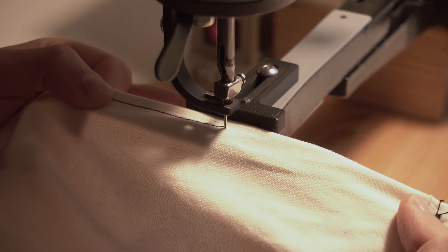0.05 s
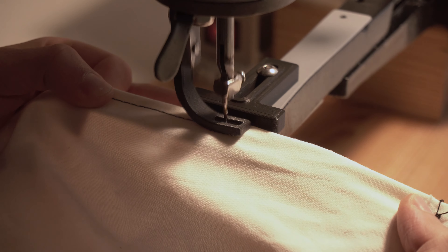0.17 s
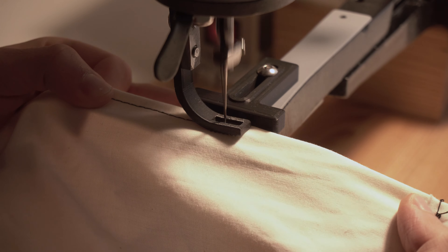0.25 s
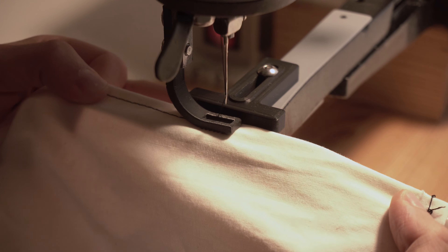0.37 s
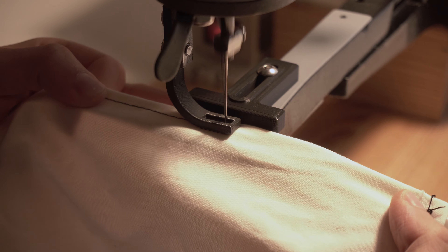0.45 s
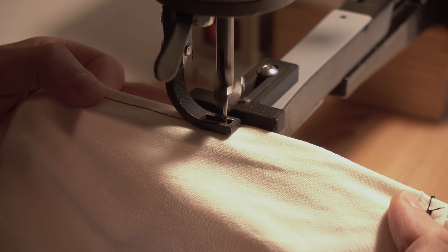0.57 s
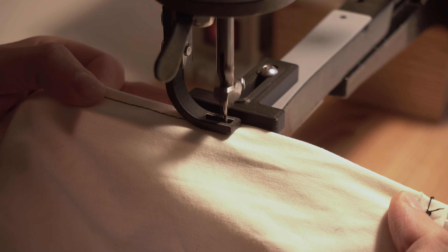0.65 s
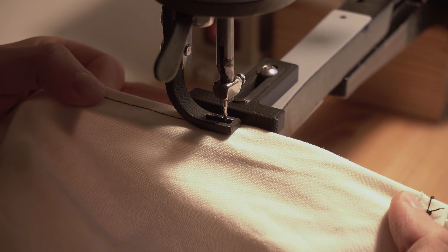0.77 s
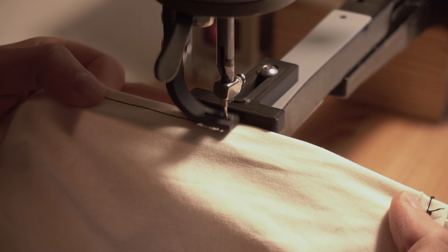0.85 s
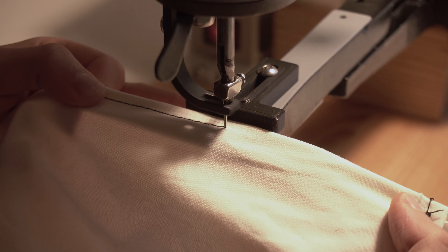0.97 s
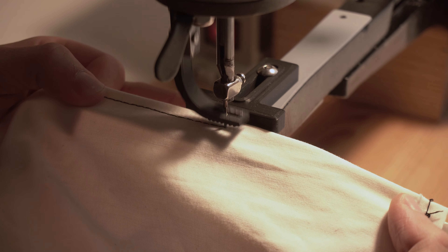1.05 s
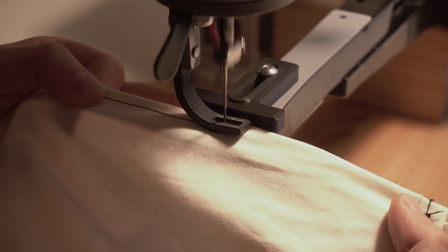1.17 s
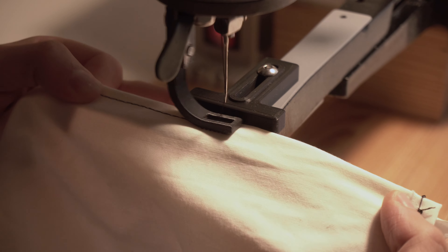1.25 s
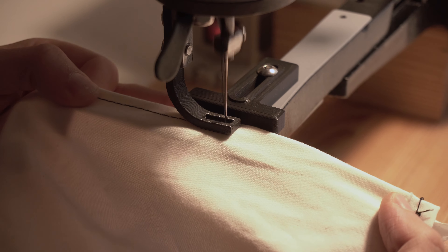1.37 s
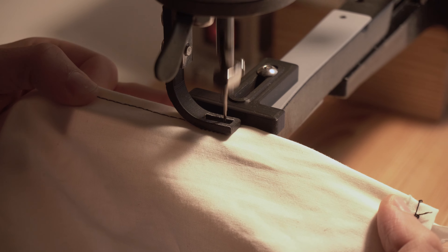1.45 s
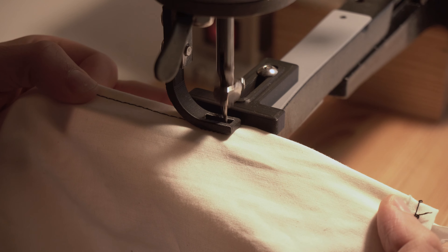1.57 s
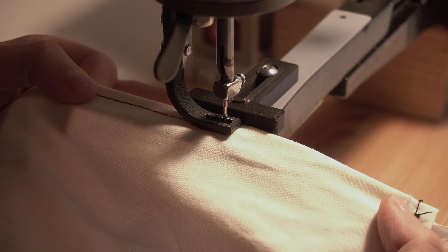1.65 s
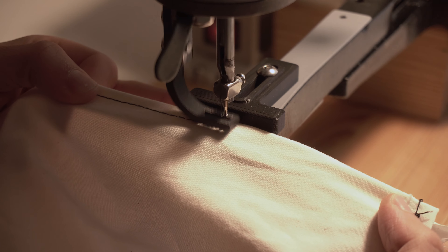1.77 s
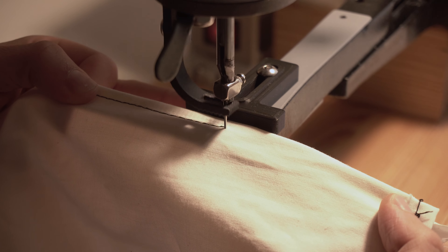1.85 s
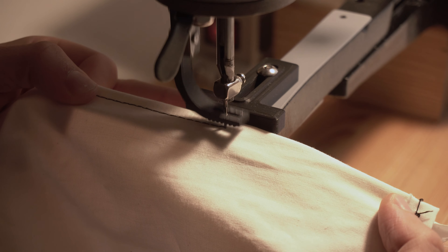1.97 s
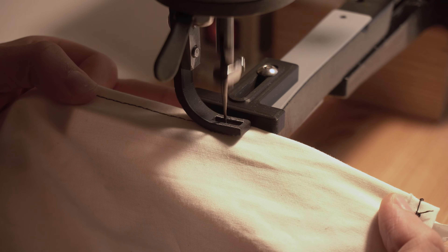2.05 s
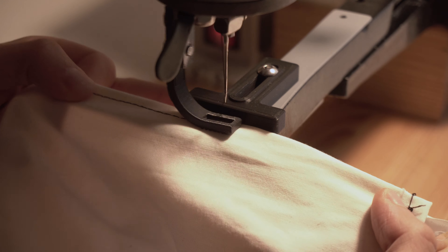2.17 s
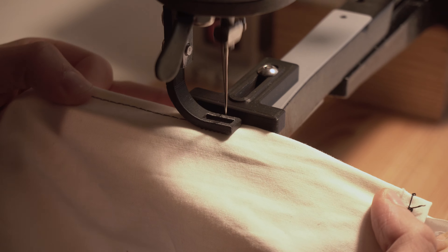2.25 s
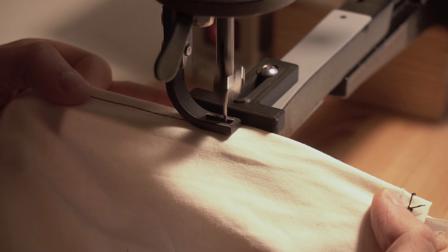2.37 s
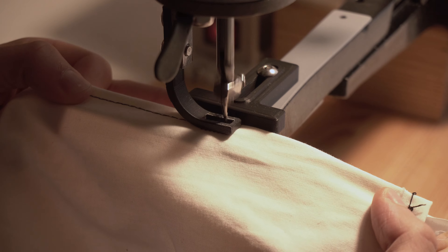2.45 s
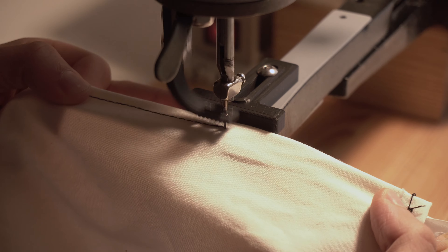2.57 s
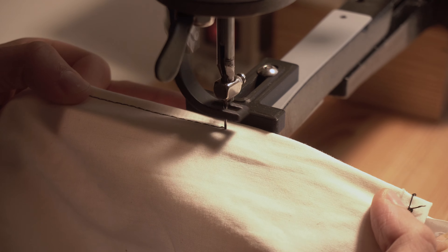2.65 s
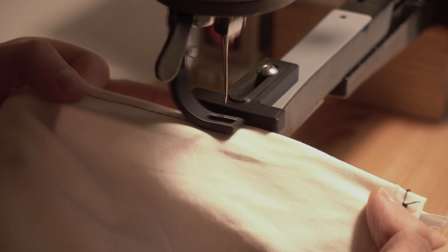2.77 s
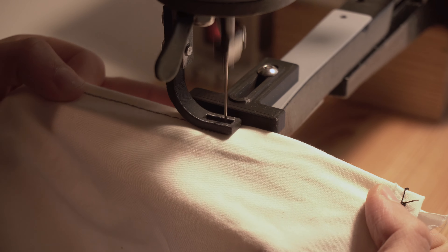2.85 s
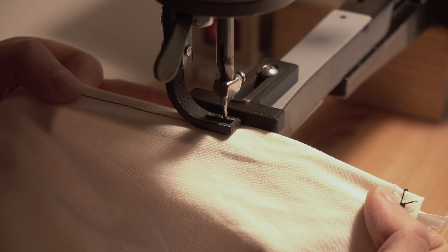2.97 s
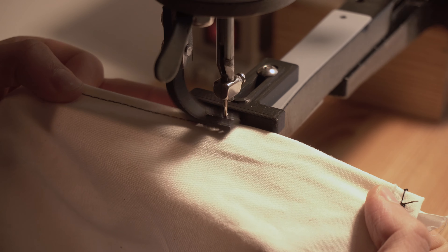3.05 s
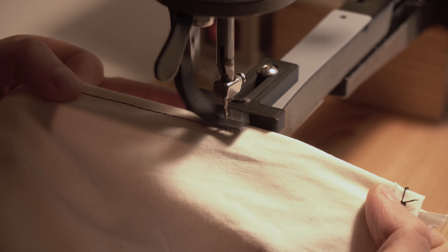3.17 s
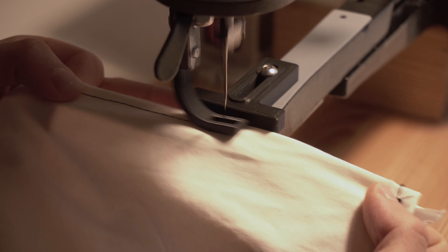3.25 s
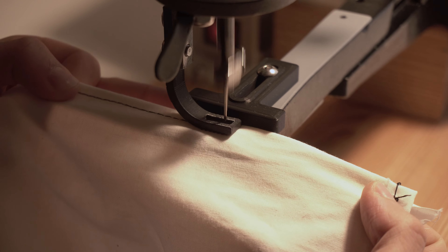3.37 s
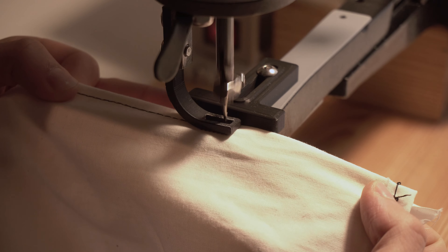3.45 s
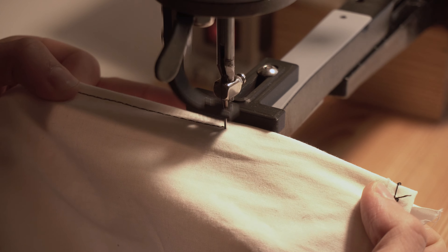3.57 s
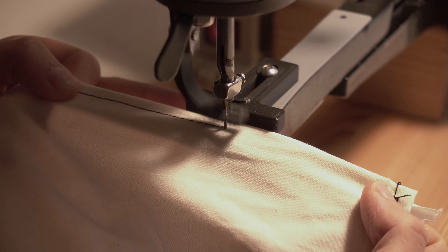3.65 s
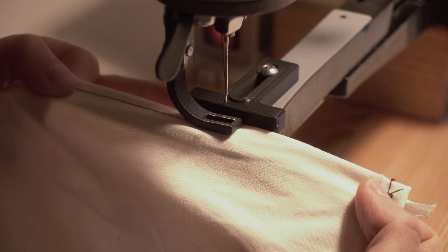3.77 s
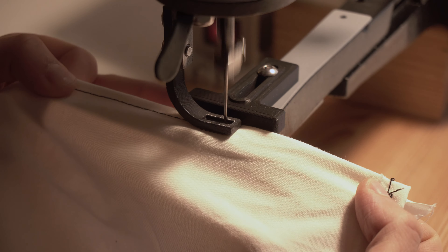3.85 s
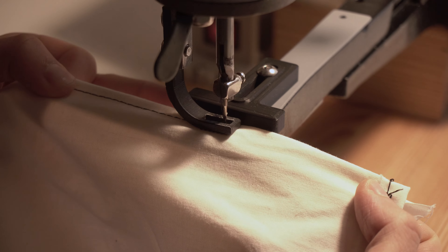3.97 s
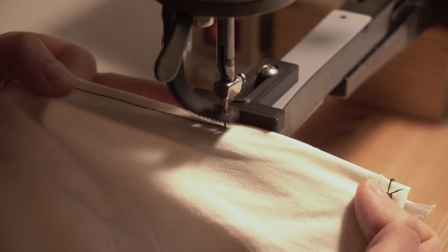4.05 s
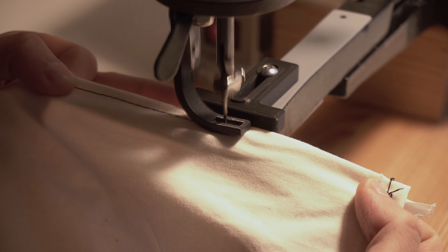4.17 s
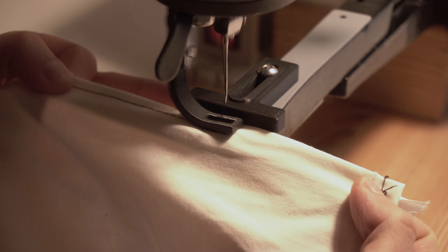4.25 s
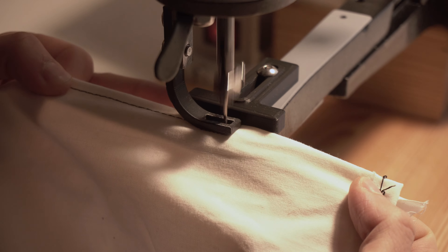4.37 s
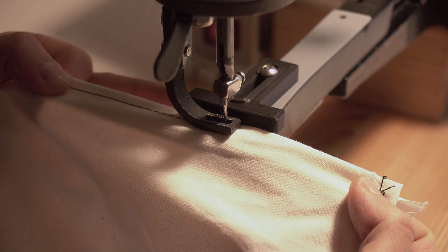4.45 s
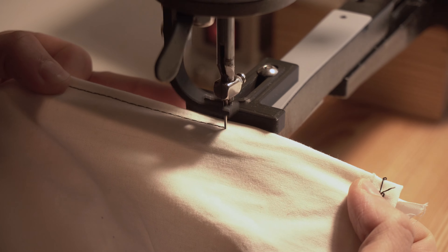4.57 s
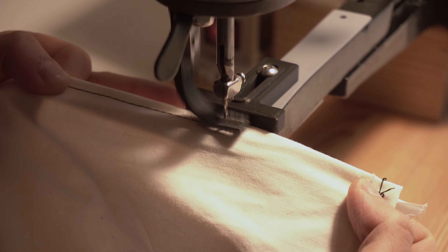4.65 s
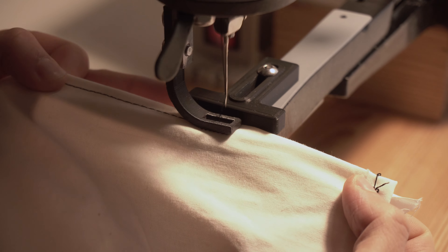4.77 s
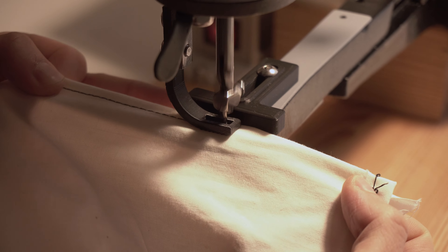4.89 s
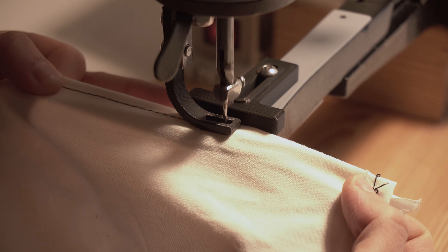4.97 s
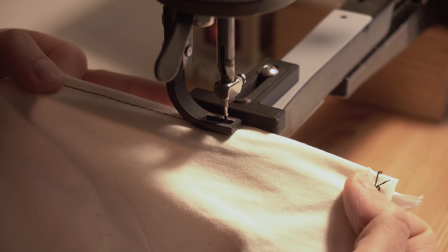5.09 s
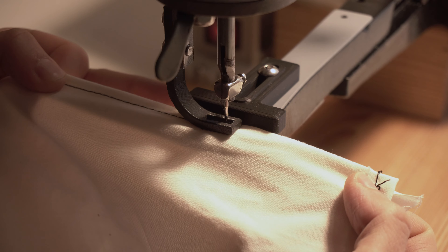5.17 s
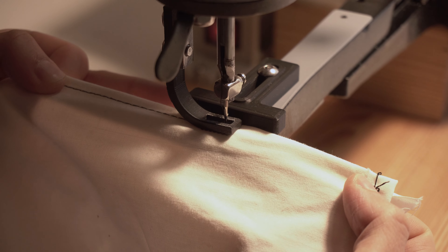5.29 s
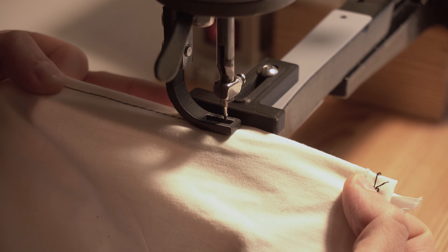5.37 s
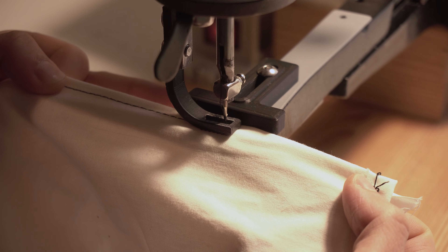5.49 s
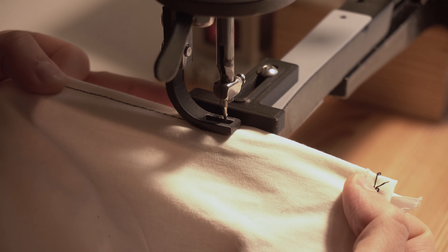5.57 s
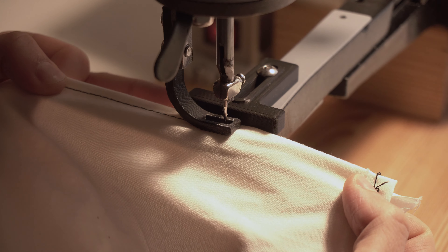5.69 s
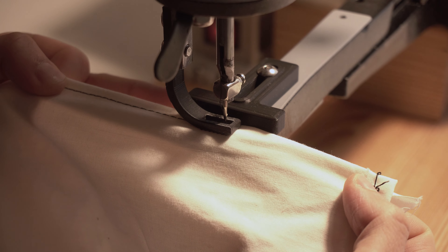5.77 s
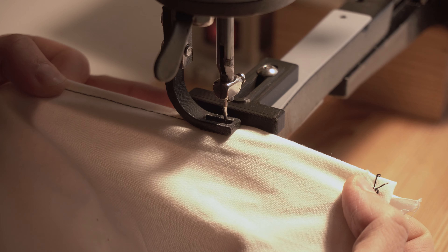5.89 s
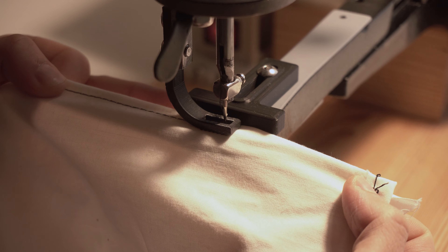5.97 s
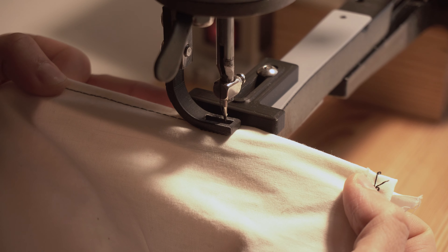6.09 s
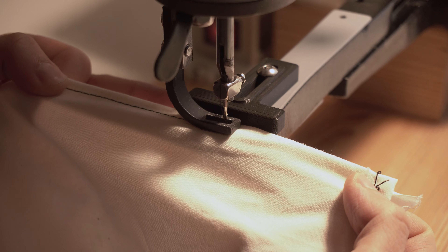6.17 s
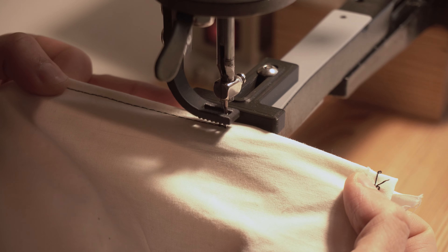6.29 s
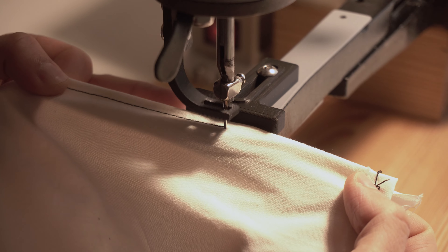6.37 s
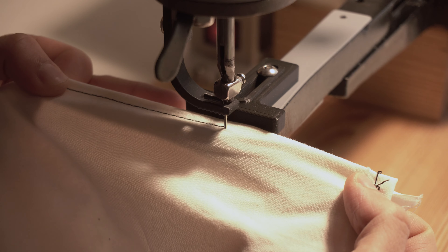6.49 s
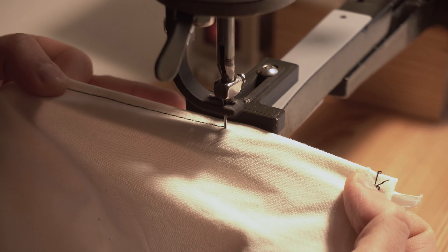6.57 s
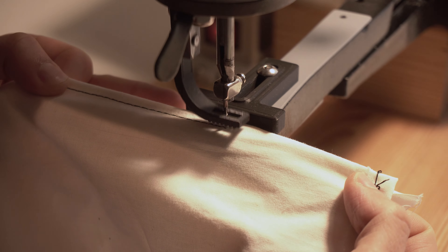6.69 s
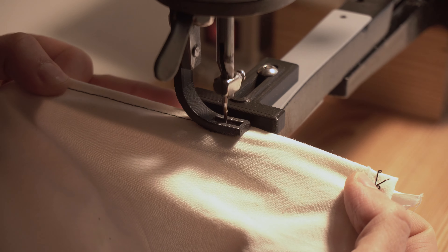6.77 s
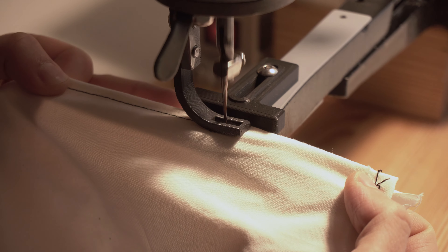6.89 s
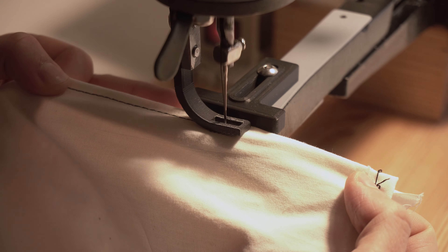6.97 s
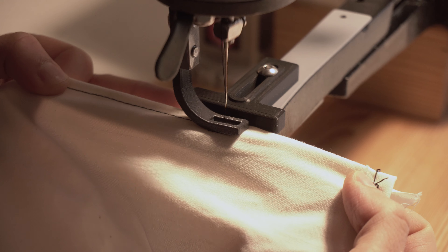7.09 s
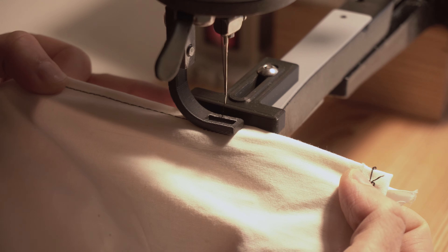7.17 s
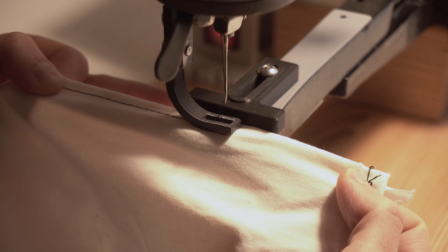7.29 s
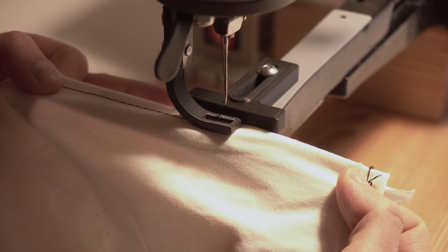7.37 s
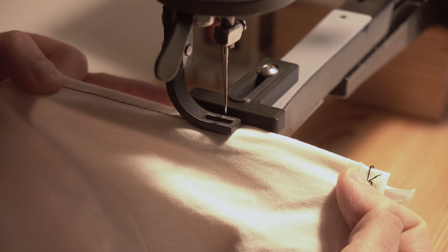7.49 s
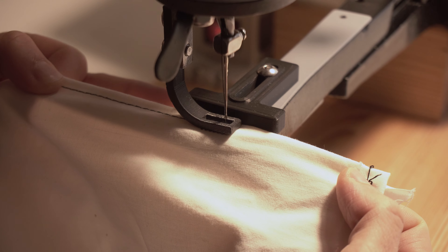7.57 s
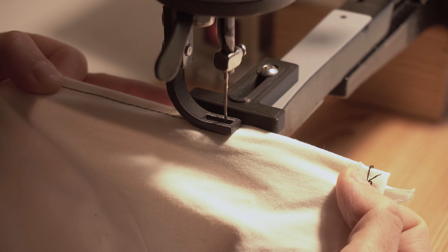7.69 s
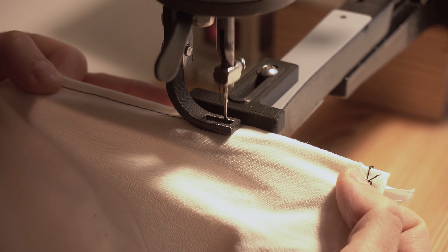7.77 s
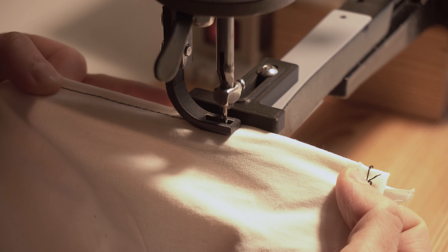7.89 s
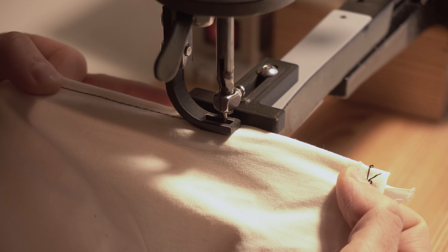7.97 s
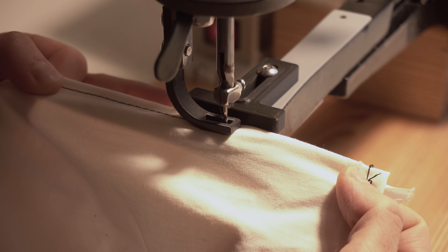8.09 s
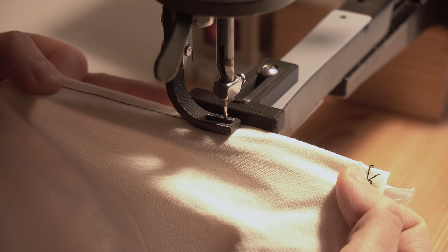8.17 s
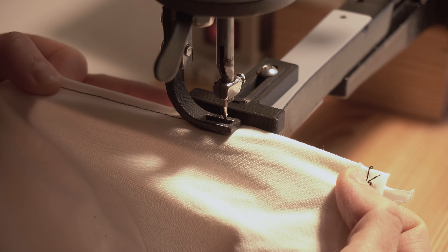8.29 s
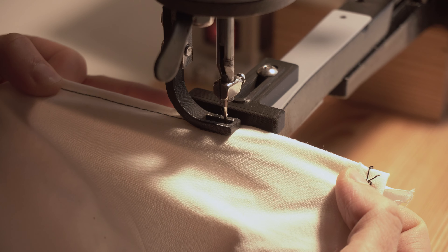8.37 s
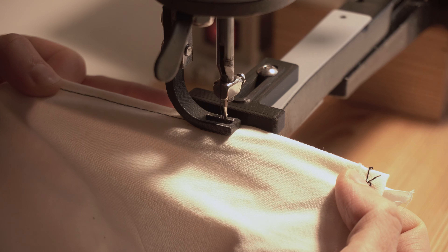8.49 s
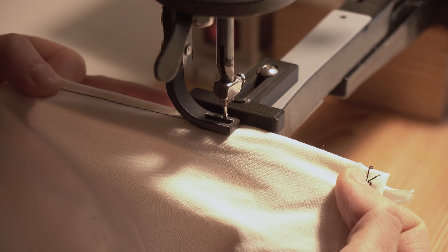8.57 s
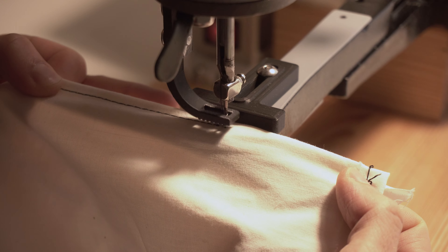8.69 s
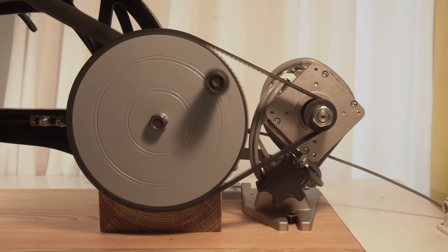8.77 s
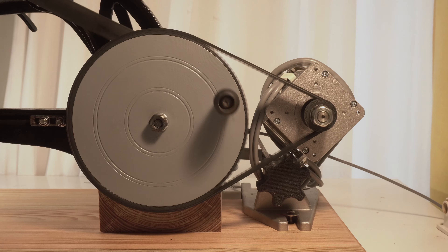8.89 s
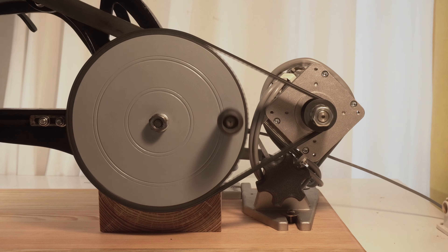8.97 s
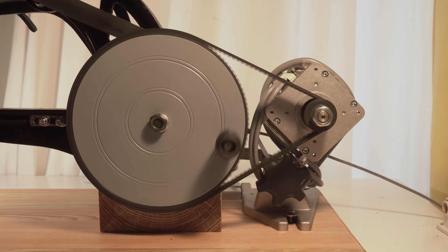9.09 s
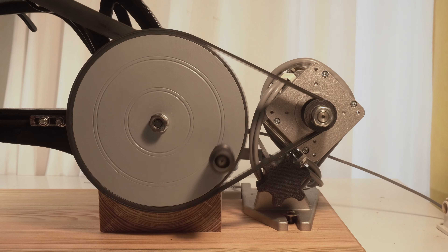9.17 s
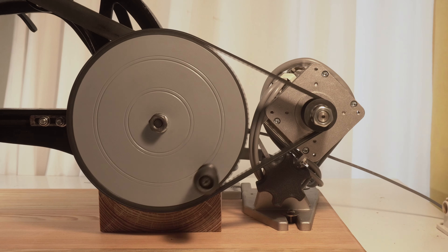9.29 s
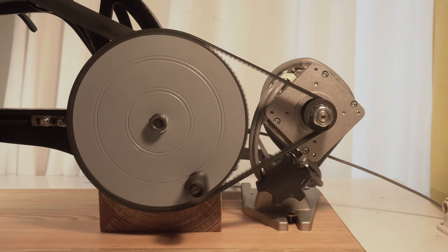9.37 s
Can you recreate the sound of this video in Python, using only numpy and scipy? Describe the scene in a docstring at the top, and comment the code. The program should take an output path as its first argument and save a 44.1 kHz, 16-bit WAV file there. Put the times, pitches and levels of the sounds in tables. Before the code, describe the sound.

A heavy motor-driven sewing machine runs close to the microphone in a small room. It makes three slow stitches, each with a metallic needle clack and a snap of the presser foot over a low drone. Five faster, louder stitches follow with rumble, gear whine and tiny thread squeaks. It coasts to a stop, then creeps on with faint ticking, one soft stitch and a light whirr.

```python
"""The rumble and drone of a heavy leather sewing machine, close to the microphone in a small room.
Belt-driven by a geared motor, it makes three slow stitches and five fast ones, coasts to a stop,
then creeps through one more. In each stitch the linkage knocks, the needle bar clacks and chatters,
the foot snaps down, the shuttle slides and the thread squeaks as it is drawn. The drive's teeth purr
under power and tick one by one at a crawl; the last ticks are heard from the motor's side."""
import sys
import numpy as np
from scipy import signal
from scipy.fft import rfft, irfft, next_fast_len
from scipy.io import wavfile
from scipy.ndimage import uniform_filter1d, map_coordinates

SR = 44100
rng = np.random.default_rng(int(sys.argv[2]) if len(sys.argv) > 2 else 0)


def wav_out(sig):
    """Save sig, one row per channel (or a flat mono array), as 16-bit PCM at SR to the path in sys.argv[1]."""
    wavfile.write(sys.argv[1], SR, np.round(np.clip(np.atleast_2d(sig).T, -1, 1) * 32767).astype(np.int16))


N = 416304
TIME = np.arange(N) / SR
AGE = np.arange(SR // 2) / SR  # seconds since a contact
FULL_SPEED_S, SWITCH_OFF_S, COAST_DB_PER_S = 2.68, 4.88, 126
BESIDE_MOTOR_S = 8.7  # from here on the microphone is on the motor's side

# The stitches. Each row: needle blow in seconds, its relative level in dB, one turn of the handwheel
# in seconds, the foot's delay after the blow in seconds, its relative level in dB.
STITCHES = [(.18, -15, .9, .195, -15.5), (1.0988, -15.5, .9, .1932, -15.5), (2.0165, -15.5, .9, .1944, -14),
            (2.7437, -6, .492, .1017, -8.5), (3.236, -5.5, .492, .1013, -8.5),
            (3.7283, -5.5, .492, .1014, -8), (4.22, -4.5, .492, .1021, -9), (4.7125, -5.5, .492, .102, -9),
            (6.69, -26, 1.8, .3704, -19)]
# Resonances of drive, levers and presser foot. Each row: pitch in Hz, width in Hz, gain in dB.
DRIVE_MODES = [(2563, 74, -4), (4403, 72, -3), (4820, 130, 2), (6080, 120, -7.5), (6780, 120, -4.5),
               (9350, 600, -5.5), (12880, 440, -10)]
LEVER_MODES = [(877, 97, 0), (1315, 57, 0), (1760, 79, -8), (2320, 240, -7)]
FOOT_MODES = [(1195, 470, -4), (2195, 200, -1), (3330, 600, -3), (7600, 420, 0), (9220, 180, -1)]
# Spectra of a bright snap, a dull knock and a tooth's tick. Each row: frequency in Hz, gain in dB.
SNAP_COLOUR = [(300, -25), (1200, -9.5), (3300, -4), (7000, -1), (12000, 0), (16000, -8)]
KNOCK_COLOUR = [(110, -19), (240, -8), (480, -1.5), (1300, -7), (2500, -7.5), (6000, -15), (16000, -19.5)]
TICK_COLOUR = [(700, -11), (2000, -5), (7500, -7), (9500, -0.5), (11000, -11.5), (12800, -1),
               (15000, -15.5)]


def amp(db):
    """Decibels to gain."""
    return 10 ** (np.asarray(db) / 20)


def unit(x):
    """Scale to rms 1."""
    return x / np.sqrt(np.mean(x ** 2) + 1e-20)


def along(points, hz):
    """Gain of (Hz, dB) points joined on a log axis."""
    knots_hz, db = np.transpose(points)
    return amp(np.interp(np.log(hz + 1), np.log(knots_hz + 1), db))


def wobble(rate):
    """A smooth random curve with rate knots a second."""
    return map_coordinates(rng.standard_normal(int(N * rate / SR) + 4), [TIME * rate])


def bump(middle, width):
    """A smooth swell in time, 1 at its middle."""
    return np.exp(-((TIME - middle) / width) ** 2 / 2)


def fade(t60):
    """Decay after a blow, 60 dB in t60 seconds."""
    return amp(-60 * AGE / t60)


def tone(hz, waver):
    """A sine whose pitch wavers by a small share."""
    return np.sin(2 * np.pi * np.cumsum(hz * (1 + waver * wobble(60))) / SR)


def add(track, s, sound):
    """Mix a sound into the track at s seconds."""
    span = track[:, max(round(s * SR), 0):][:, :len(AGE)]
    span += sound[:, :span.shape[1]]


def resonances(modes, hz):
    """Response of a set of (Hz, width in Hz, dB) resonators."""
    return sum((-1) ** k * amp(db) * 1j * hz * width / (fc * fc - hz * hz + 1j * hz * width)
               for k, (fc, width, db) in enumerate(modes))


def part(colour, modes, boost_db, ripple_db=3, spacing_hz=70):
    """Response of a machine part: broad colour, main resonances and a thicket of lesser ones."""
    thicket = rng.standard_normal(SR // 2)
    grid = np.fft.rfftfreq(len(AGE), 1 / SR)
    ripple = np.interp(grid / spacing_hz, np.arange(len(thicket)), thicket)
    lesser = amp(ripple_db * ripple * grid / (grid + 900))
    main = np.hypot(1, amp(boost_db) * np.abs(resonances(modes, grid)))
    gain = along(colour, grid) * lesser * main
    return lambda hz: np.interp(hz, grid, gain)


def ring(modes, stir_db=1.5):
    """Colour of a ringing part; each contact stirs its modes in different proportions."""
    stirred = [(fc, width, db + stir_db * rng.standard_normal()) for fc, width, db in modes]
    return lambda hz: np.abs(resonances(stirred, hz)) ** 2


def frame(hz):
    """Response of the cast frame on its bench."""
    # Their resonances. Each row: pitch in Hz, width in Hz, gain in dB.
    frame_modes = [(202.7, 22, -8), (263.7, 34, -2.5), (399, 33.6, 1.5), (432, 45, 0.5), (525, 47, -2),
                   (676, 75, -5), (780, 70, -5)]
    return np.abs(resonances(frame_modes, hz)) / (1 + (hz / 1500) ** 2)


def stereo(pair, colour):
    """Colour a mid and side pair and spread it left and right at rms 1; the bass stays central."""
    # Width at the microphone. Each row: frequency in Hz, side over mid in dB.
    side_gain = [(120, -51), (300, -27.5), (600, -16), (1200, -7), (10000, -2.5)]
    size = next_fast_len(pair.shape[1])
    hz = np.fft.rfftfreq(size, 1 / SR)
    mid, side = rfft(pair, size) * colour(hz)
    side = side * along(side_gain, hz)
    return unit(irfft([mid + side, mid - side], size)[:, :pair.shape[1]])


def noise(colour):
    """Steady coloured stereo noise."""
    return stereo(rng.standard_normal((2, N)), colour)


def hum(modes):
    """Steady shaking heard only through narrow resonances."""
    return noise(lambda hz: resonances(modes, hz) ** 2)


def burst(colour, envelope):
    """A struck part's countless short-lived modes, as shaped noise; reflections widen it."""
    mid, side = rng.standard_normal((2, len(AGE)))
    reflected = 1 - np.exp(-AGE / .0085)
    return envelope * stereo(np.array([mid, side * reflected]), colour)


def driven():
    """Needle blow and turn length, in seconds, of the stitches sewn under power."""
    return [(s, turn) for s, _, turn, _, _ in STITCHES if s < SWITCH_OFF_S]


def each_turn(contacts):
    """Seconds and dB of contacts in every turn: set by the speed, dying away as the machine coasts."""
    shortest = min(turn for _, turn in driven())
    events = [(s + share * turn, db - slow_db * np.log2(turn / shortest))
              for s, turn in driven() for share, db, slow_db in contacts]
    return [(s, db - COAST_DB_PER_S * max(s - SWITCH_OFF_S, 0)) for s, db in events]


def at_full_speed():
    """A soft gate, 1 during the fast stitches."""
    return uniform_filter1d(1.0 * (TIME > FULL_SPEED_S) * (TIME < SWITCH_OFF_S + .08), size=3000)


def running_levels():
    """Rumble and sliding in dB; each feed swells the rumble, less so when the flywheel is fast."""
    # The running mechanism. Each row: time in seconds, frame rumble in dB, sliding steel in dB.
    levels = [(0, -48, -52), (2.4, -49.5, -50.5), (2.7, -41.5, -42.5), (4.93, -41.5, -42.5),
              (5.2, -57, -72.5), (5.35, -87.5, -80.5), (5.875, -94.5, -85.5), (5.9, -66.5, -67.5),
              (7.05, -61, -71), (7.25, -57, -52.5), (7.5, -57, -67.5), (7.85, -61, -73.5),
              (8.7, -65.5, -71), (9.0, -80, -73)]
    times, rumble_db, slide_db = np.transpose(levels)
    load = sum(turn ** 2 * bump(s + .33 * turn, .2 * turn) for s, turn in driven())
    return np.interp(TIME, times, rumble_db) + 7 * load, np.interp(TIME, times, slide_db)


def jolts(per_second=200):
    """Small jolts of unequal size shake the frame and a random set of narrow bench modes."""
    knots_hz = np.arange(0, SR, 16)
    bench_db = 3 * rng.standard_normal(len(knots_hz))
    bench = lambda hz: frame(hz) * amp(np.interp(hz, knots_hz, bench_db))
    swell = amp(3 * wobble(18))
    hits = rng.random(N) < per_second / SR
    contacts = unit(hits * amp(2 * rng.standard_normal(N)) * rng.choice([-1, 1], (2, N)))
    return swell * stereo(contacts, bench)


def main_shaft():
    """The shaft's two ends rumble while oiled steel slides in the bearings."""
    # Spectrum of sliding steel. Each row: frequency in Hz, gain in dB.
    slide_colour = [(60, -2), (600, 9), (1100, 9.5), (2000, 5), (6000, -1.5), (10000, -5.5), (16000, -15.5)]
    rumble_db, slide_db = running_levels()
    slide = noise(lambda hz: along(slide_colour, hz))
    return amp(rumble_db) * unit(jolts() + jolts()) + amp(slide_db + 2.3 * wobble(110)) * slide


def motor(drone_hz=141.7, groan_hz=270.3):
    """The motor drones through the bench, sags as the belt surges and groans on a slow feed."""
    # Belt surges. Each row: delay after the needle blow in seconds, relative level in dB.
    surges = [(.08, -46.5), (.29, -44), (.46, -46.5)]
    surge = sum(amp(db) * turn ** .7 * bump(s + late, .034)  # weaker when the flywheel is fast
                for s, turn in driven() for late, db in surges if s + late < SWITCH_OFF_S)
    sag = 1 - .05 * surge / surge.max()
    rumble_db, _ = running_levels()
    drone_db = np.minimum(-58.5, rumble_db - 12.5)  # follows the rumble up to a ceiling
    drone = (amp(drone_db) + surge) * amp(wobble(20)) * tone(drone_hz * sag, waver=.04)
    low_hum = amp(drone_db - .5) * hum([(135, 30, 0), (261, 39, -2)])
    slow_feed = (1 - at_full_speed()) * sum(bump(s + .39 * turn, .14 * turn) for s, turn in driven())
    groan = slow_feed * amp(-45.5 + 2.4 * wobble(15)) * tone(groan_hz * sag, waver=.026)
    return drone + low_hum + groan


def tooth_purr(teeth_per_turn=53, ceiling_db=-50):
    """Under power the drive's teeth meet so quickly that their ticks merge into a ringing purr."""
    _, turns = np.transpose(driven())
    turn_s = np.interp(TIME, [FULL_SPEED_S - .25, FULL_SPEED_S], [turns.max(), turns.min()])
    tooth_hz = teeth_per_turn / turn_s
    count = np.cumsum(tooth_hz) / SR
    since_tooth = count % 1 / tooth_hz
    sizes = amp(2 * rng.standard_normal(N))[count.astype(int)]
    pulses = lambda t60: unit(sizes * amp(-60 * since_tooth / t60))
    purr = pulses(.025) * noise(part(TICK_COLOUR, DRIVE_MODES, boost_db=9))
    pings = pulses(.12) * hum(DRIVE_MODES)
    _, slide_db = running_levels()
    coasting_db = -COAST_DB_PER_S * np.maximum(TIME - SWITCH_OFF_S, 0) / 2
    return amp(np.minimum(slide_db, ceiling_db) + coasting_db) * (amp(-4) * purr + amp(-7) * pings)


def shuttle():
    """The shuttle clicks as it turns round and rasps along its race, ringing all the while."""
    # Its resonances. Each row: pitch in Hz, width in Hz, gain in dB.
    shuttle_modes = [(10180, 500, -2.5), (10900, 440, -7), (14360, 300, -1)]
    # Spectrum of the rasp. Each row: frequency in Hz, gain in dB.
    rasp_colour = [(200, -14), (800, 7.5), (2000, 2), (6000, -1), (9000, 0), (16000, -12)]
    # Clicks of shuttle and thread lever. Each row: offset from the needle blow in turns,
    # relative level at full speed in dB, loss at half speed in dB.
    turn_clicks = [(-.308, -22, 6), (.151, -23.5, 6.5), (.277, -21.5, -1), (.319, -24, 10.5),
                   (.43, -28.5, 6)]
    # Stray clicks while creeping. Each row: start in seconds, relative level in dB.
    stray_clicks = [(6.6601, -38.5), (6.6901, -36), (7.1318, -29.5), (7.156, -35), (7.26, -27.5),
                    (7.545, -37.5), (7.583, -41), (7.6117, -33.5)]
    out = np.zeros((2, N))
    struck = part(SNAP_COLOUR, shuttle_modes, boost_db=1)
    for s, db in each_turn(turn_clicks) + stray_clicks:
        add(out, s, amp(db - 8) * burst(struck, fade(.057)))
        add(out, s, amp(db - 20) * burst(struck, fade(.23)))  # the room answers
        add(out, s, amp(db - 24.5) * burst(ring(shuttle_modes), fade(.14)))
    for s, db in stray_clicks:  # slow, heavy contacts also make the foot clink
        add(out, s, amp(db - 15) * burst(ring(FOOT_MODES), fade(.14)))
    _, slide_db = running_levels()
    passes = sum(bump(s + .33 * turn, .091 * turn) for s, turn in driven())
    creeping_pass = amp(-54.5) * bump(7.68, .06)
    pressure = amp(slide_db + 8) * passes + creeping_pass
    rasp = noise(part(rasp_colour, shuttle_modes, boost_db=10.5))
    return out + pressure * amp(1.7 * wobble(130)) * rasp


def thread(rise_s=.006, scatter_s=.018):
    """The taut thread sticks and slips in clusters of three gliding chirps, each at its own pitch."""
    # Squeaks in every turn. Each row: offset from the needle blow in turns, pitch in Hz,
    # level over the sliding steel in dB.
    turn_squeaks = [(-.275, 10110, 1.5), (-.27, 14200, -4), (.29, 14500, 0.5), (.37, 10110, 7)]
    # Stray squeaks while creeping. Each row: time in seconds, pitch in Hz, level in dB.
    stray_squeaks = [(6.06, 10300, -55), (7.19, 14400, -57), (7.63, 10860, -54.5)]
    out = np.zeros((2, N))
    _, slide_db = running_levels()
    squeaks = [(s + share * turn, hz, np.interp(s, TIME, slide_db) + db)
               for s, turn in driven() for share, hz, db in turn_squeaks]
    for s, hz, db in squeaks + stray_squeaks:
        for when, pitch, glide, length, size in rng.standard_normal(size=(3, 5)):
            age = AGE / (rise_s * amp(2.7 * length))
            scrape = unit(uniform_filter1d(rng.standard_normal(len(AGE)), size=24))
            bend = .014 * pitch + .006 * glide * np.minimum(age, 2) + .017 * scrape
            phase = 2 * np.pi * np.cumsum(hz * (1 + bend)) / SR + .5 * rng.standard_normal((2, 1))
            chirp = age * np.exp(1 - age) * np.sin(phase)
            add(out, s - rise_s + scatter_s * when, amp(db + 2 * size) * chirp)
    return out


def linkage():
    """Levers take up their play as they reverse, ring hollowly and thud into the frame."""
    # Knocks in every turn. Each row: offset from the needle blow in turns,
    # relative level at full speed in dB, loss at half speed in dB.
    turn_knocks = [(-.188, -14, 12), (.588, -15.5, 30.5)]
    # Stray knocks while coasting and creeping. Each row: start in seconds, relative level in dB,
    # thud of the frame in dB.
    stray_knocks = [(5.122, -44.5, -47), (6.695, -38.5, -53), (6.7218, -39, -48), (7.153, -34, -47.5),
                    (7.22, -39, -43), (7.261, -44, -44.5), (7.383, -41, -46.5), (8.653, -37, -55),
                    (8.726, -44.5, -50)]
    out = np.zeros((2, N))
    levers = part(KNOCK_COLOUR, LEVER_MODES, boost_db=8)
    contact = 1 - np.exp(-AGE / .0007)
    regular = [(s, db, db - 23.5) for s, db in each_turn(turn_knocks)]
    for s, db, thud_db in regular + stray_knocks:
        add(out, s, amp(db - 10.5) * burst(levers, contact * fade(.13)))
        add(out, s, amp(db - 18.5) * burst(ring(LEVER_MODES), contact * fade(.34)))
        add(out, s, amp(thud_db) * burst(frame, contact * fade(.32)))
    return out


def needle_bar():
    """The bar touches, strikes home, then chatters in its bearings; a faster stroke is louder."""
    # Resonances of the steel head and bar. Each row: pitch in Hz, width in Hz, gain in dB.
    head_modes = [(810, 60, -5), (963, 34, -2.5), (1208, 33, -3), (1460, 50, -4), (2600, 81, -2.5),
                  (4700, 80, -4), (7050, 54, -1.5), (7210, 85, 2), (9430, 400, -3)]
    # Spectrum of the clack. Each row: frequency in Hz, gain in dB.
    clack_colour = [(120, -36), (220, -10), (900, 3.5), (2000, -4.5), (5000, 1), (9000, -2), (16000, -6.5)]
    out = np.zeros((2, N))
    head = part(clack_colour, head_modes, boost_db=7)
    tip = part(SNAP_COLOUR, head_modes, boost_db=13)
    hollow = lambda hz: head(hz) * np.abs(resonances([(1150, 700, 0)], hz)) ** 2
    body = lambda hz: along(KNOCK_COLOUR, hz)
    chatter = unit(amp(2.5 * wobble(330)))  # separate contacts in quick succession
    swell = 1 - np.exp(-AGE / .0068)
    loudest_db = max(db for _, db, *_ in STITCHES)
    for s, db, *_ in STITCHES:
        force_db = db - loudest_db
        lead_s = .009 * amp(-force_db / 2)  # a faster stroke closes the gap sooner
        for early, touch_db in ((lead_s, -16), (lead_s / 2, -19.5)):
            add(out, s - early, amp(1.14 * force_db + touch_db) * burst(head, fade(2.6 * lead_s)))
        add(out, s, amp(.8 * force_db - 7.5) * burst(tip, fade(.016)))
        knocks = chatter[round(s * SR):][:len(AGE)] * swell
        add(out, s, amp(db - 12.5) * burst(head, knocks * (fade(.11) + amp(-5.5) * fade(.27))))
        add(out, s + .0065, amp(db - 7) * burst(tip, swell * fade(.057)))  # rebounds
        # the head's low modes build up under the chatter and linger after a slow stroke
        linger = swell ** 2 * fade(.2 * amp(-force_db / 5))
        add(out, s, amp(.9 * force_db - 23.5) * burst(hollow, linger))
        # the needle's push through the work shakes the frame
        add(out, s, amp(.5 * force_db - 27.5) * burst(body, swell * fade(.33)))
    return out


def presser_foot():
    """The sprung foot lands with a bright tick, clatters and clinks; bench and room throw it back."""
    # Its contacts. Each row: delay after landing in seconds, gain in dB, 60 dB decay in seconds.
    bounces = [(.0005, -10.5, .012), (.0026, -8, 0.018), (.0095, -16, .05), (.033, -27, 0.026)]
    out = np.zeros((2, N))
    steel = part(SNAP_COLOUR, LEVER_MODES, boost_db=13.5)
    edge = lambda hz: steel(hz) * hz ** 2 / (hz ** 2 + 8000 ** 2)
    for blow, _, _, delay, db in STITCHES:
        s = blow + delay
        add(out, s + .0004, amp(db - 4) * burst(edge, fade(.023)))
        for late, bounce_db, t60 in bounces:
            add(out, s + late, amp(db + bounce_db) * burst(steel, fade(t60)))
        add(out, s + .002, amp(db - 16.5) * burst(ring(FOOT_MODES), fade(.12)))
        add(out, s + .009, amp(db - 23.5) * burst(steel, fade(.26)))
        add(out, s, amp(db - 30.5) * burst(frame, fade(.45)))
    return out


def gear_whine():
    """At full speed the gears whine, dragged down by each blow and recovering, and the wheel hums."""
    # The whine through one turn. Each row: turns after the needle blow, pitch in Hz, level in dB.
    whine_cycle = [(0, 506, -40.5), (.07, 484.7, -37), (.14, 443, -36.5), (.29, 445.5, -31.5),
                   (.35, 483, -40.5), (.6, 479.2, -38.5), (.75, 482.8, -48.5)]
    starts, turns = np.transpose(driven())
    wheel = (TIME - starts[-1]) / turns[-1] % 1
    shares, pitches, levels = np.transpose(whine_cycle)
    gear_hz = np.interp(wheel, shares, pitches, period=1)
    gear_db = np.interp(wheel, shares, levels, period=1)
    whine = amp(gear_db + 3.5 * wobble(55)) * tone(gear_hz, waver=.03)
    swing = np.cos(2 * np.pi * wheel)  # highest and loudest as the needle comes down
    wheel_hum = amp(-44 + 2 * swing + 2.6 * wobble(20)) * tone(240 + 8 * swing, waver=.03)
    return at_full_speed() * (whine + wheel_hum)


def tooth_ticks(gap_s=.047, rest_s=.036, tooth_db=-59):
    """At a crawl single teeth tick and ping; light ones lead up to a heavy one that knocks the frame."""
    # Heavy teeth. Each row: start in seconds, relative level in dB.
    heavy_teeth = [(5.899, -46.5), (6.047, -45.5), (6.173, -48.5), (6.262, -50), (6.371, -54), (6.514, -47),
                   (6.625, -44), (6.952, -49), (7.479, -47), (7.712, -42.5), (7.797, -46.5), (7.876, -50),
                   (7.956, -44), (8.113, -44), (8.237, -46), (8.354, -44.5), (8.48, -48.5), (8.64, -49),
                   (8.726, -49), (8.827, -48.5), (8.989, -51), (9.188, -49), (9.309, -52), (9.421, -58)]
    out = np.zeros((2, N))
    teeth = part(TICK_COLOUR, DRIVE_MODES, boost_db=5.5)
    sizzle = lambda hz: teeth(hz) * np.clip(hz / 9000, 0, 1) ** 4
    body = lambda hz: along(KNOCK_COLOUR, hz) * np.clip(hz / 250, 0, 1) / np.hypot(1, hz / 2200)
    for s, db in heavy_teeth:
        add(out, s, amp(db - 15.5) * burst(body, fade(.21)))
        add(out, s, amp(db - 11.5) * burst(ring(DRIVE_MODES), fade(.18)))
        add(out, s, amp(db - 11) * burst(frame, fade(.33)))
    heavy = [s for s, _ in heavy_teeth]
    light = [s for last, following in zip(heavy, heavy[1:])
             for s in np.arange(following - gap_s, last + rest_s, -gap_s)]
    tick_shape = (1 - fade(.01)) * (fade(.05) + amp(-12) * fade(.2))
    for s in heavy + light:
        db = tooth_db + rng.standard_normal()
        beside = s > BESIDE_MOTOR_S  # from the motor's side the teeth tick more and ping less
        tick_db, ping_db = db + .5 * beside, db - 4.5 - 8 * beside
        add(out, s, amp(tick_db) * burst(teeth, tick_shape))
        add(out, s, amp(tick_db - 9.5) * burst(sizzle, fade(.26)))
        add(out, s, amp(ping_db) * burst(ring(DRIVE_MODES), fade(.13)))
    return out


def housing():
    """A faint hum shows at the standstill; from the motor's side its housing's whirr comes forward."""
    # Resonances of the housing. Each row: pitch in Hz, width in Hz, gain in dB.
    housing_modes = [(143, 12, -4), (377, 65, -1), (1315, 61, -8.5), (1870, 212, -8)]
    idle = amp(-90) * hum([(281, 14, 0)])
    near = np.clip((TIME - BESIDE_MOTOR_S) / .095, 0, 1)
    return idle + near * amp(-69) * hum(housing_modes)


def scene():
    """The whole machine from close by: the stitching parts over the drive that turns them."""
    stitching = needle_bar() + presser_foot() + shuttle() + thread() + linkage()
    return stitching + tooth_ticks() + tooth_purr() + main_shaft() + motor() + gear_whine() + housing()


def record(dry):
    """The microphone thins the deep bass and keeps nothing above its band limit."""
    low_cut_hz, top_hz = 85, 16050
    thin = signal.sosfilt(signal.butter(2, low_cut_hz, "highpass", fs=SR, output="sos"), dry)
    size = next_fast_len(N + SR // 2)
    in_band = np.fft.rfftfreq(size, 1 / SR) < top_hz
    return irfft(rfft(thin, size) * in_band, size)[:, :N]


dry = scene()
out = record(dry)
wav_out(out)
```